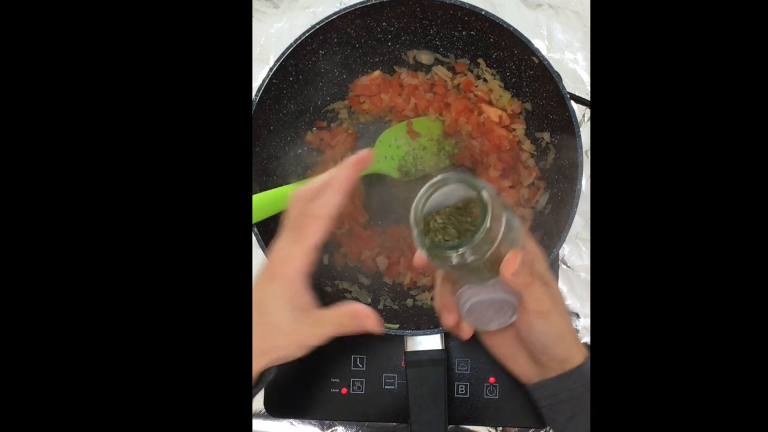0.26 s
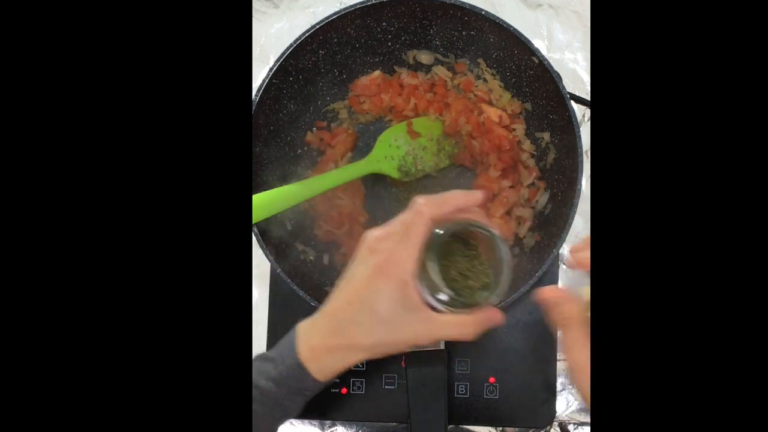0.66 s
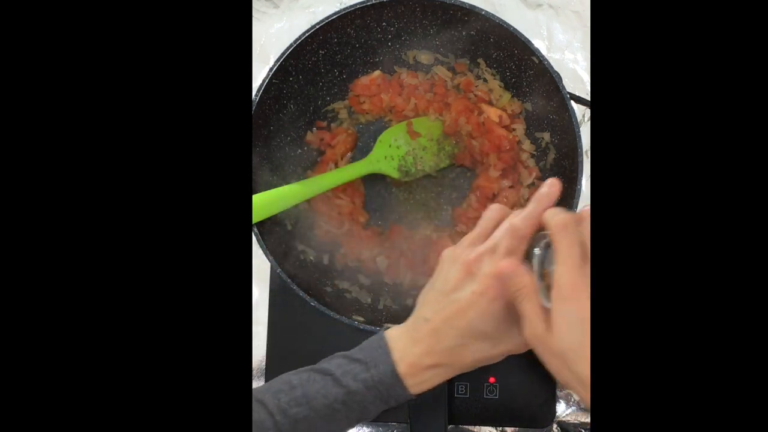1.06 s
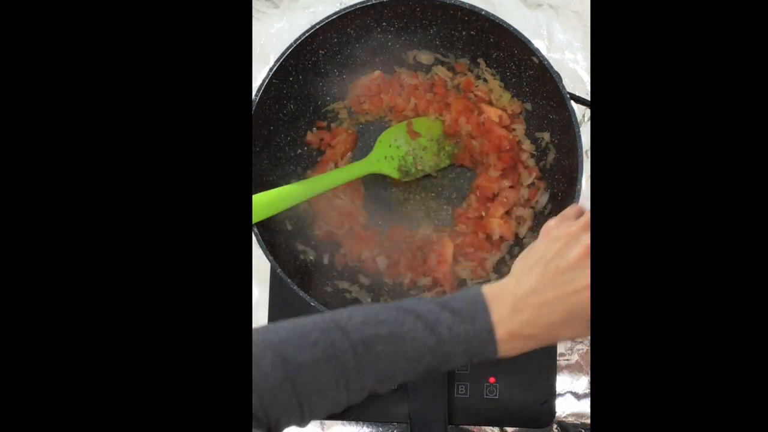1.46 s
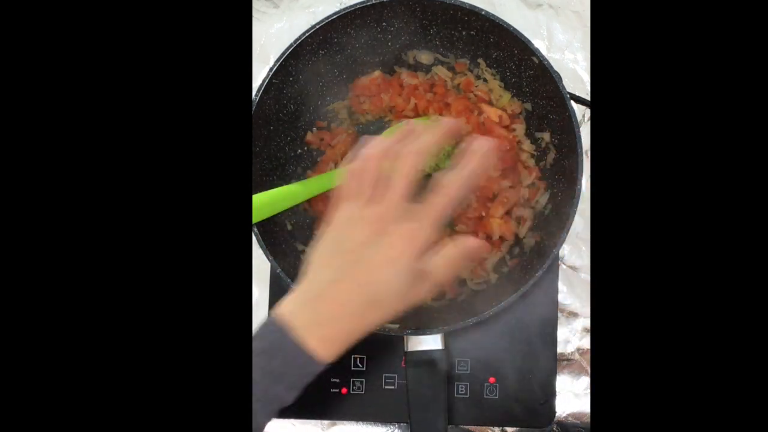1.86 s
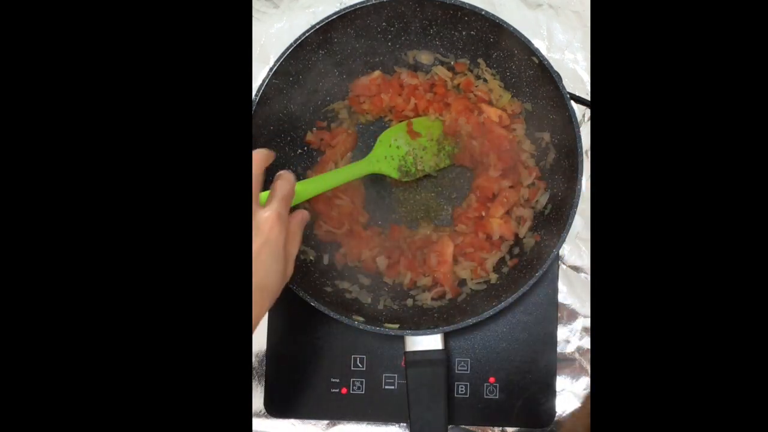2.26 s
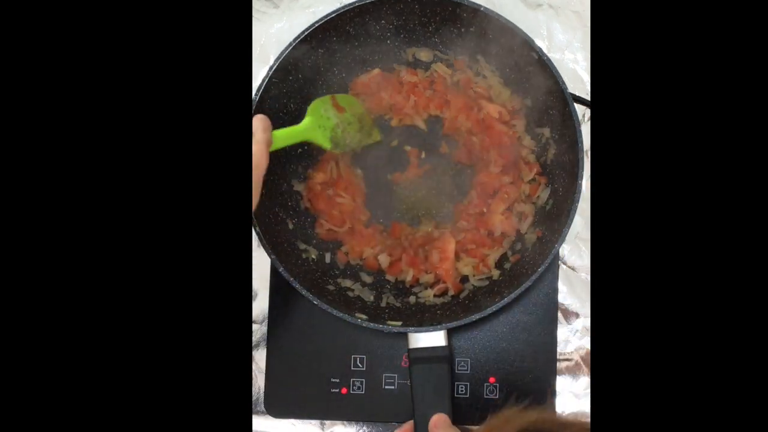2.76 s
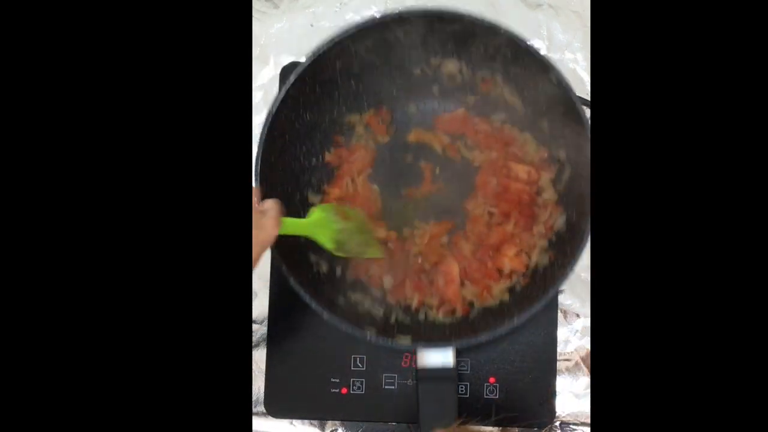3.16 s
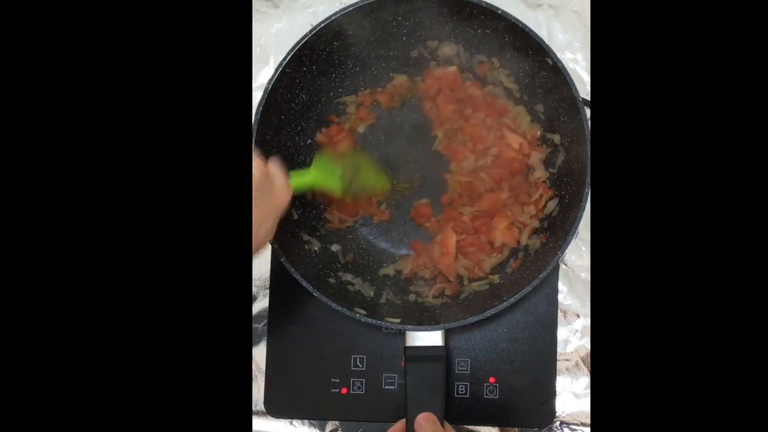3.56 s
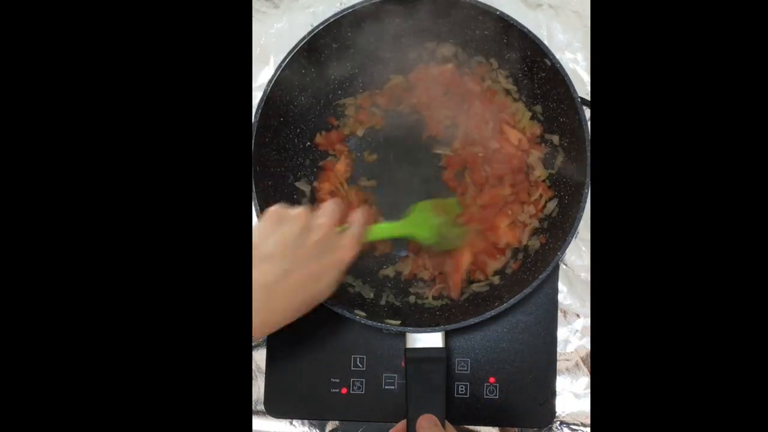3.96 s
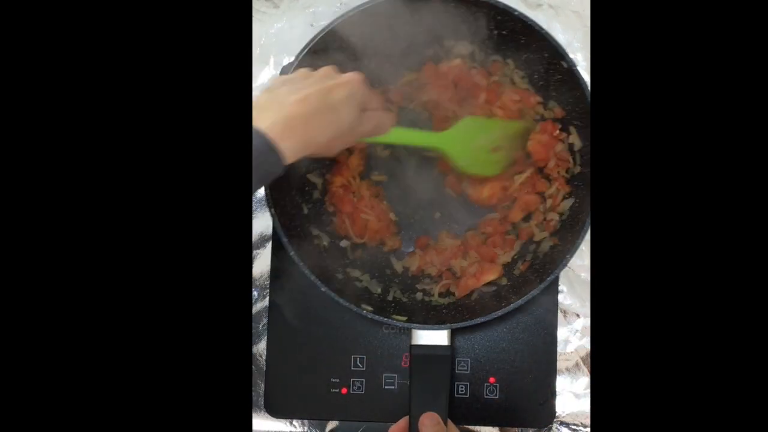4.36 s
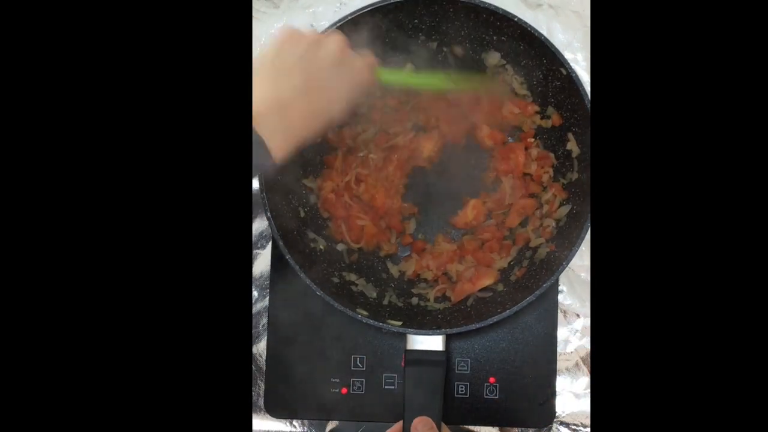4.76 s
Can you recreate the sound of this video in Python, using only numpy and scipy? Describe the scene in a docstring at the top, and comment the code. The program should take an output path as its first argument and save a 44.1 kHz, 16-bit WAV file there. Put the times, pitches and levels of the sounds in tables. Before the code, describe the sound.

Over gentle frying and a low fan drone, jar clicks, a bright glassy clatter, a ringing knock, a thud, then sizzling stirring.

```python
"""Small kitchen, induction hob: tomato and onion fry gently in a pan, as banded bursts of noise over a fan and hum.
A glass jar is capped, clatters into place, then knocks the pan with a ring and a thud:
impulses excite two-pole modes, with decaying noise for the diffuse ring.
A silicone spatula then bumps the pan in low tones and stirs; enveloped noise gives drags, squelches and surges."""
import sys
import numpy as np
from scipy import signal
from scipy.fft import rfft, irfft
from scipy.io import wavfile
from scipy.ndimage import map_coordinates

SR = 44100
rng = np.random.default_rng(int(sys.argv[2]) if len(sys.argv) > 2 else 0)


def dump_mix(stems):
    """Bounce the given channels to the path in sys.argv[1] as a 16-bit WAV at rate SR."""
    frames = np.atleast_2d(stems).T  # one column per channel
    limited = np.clip(frames, -1, 1)  # hard clip at full scale
    pcm = np.round(limited * 32767).astype(np.int16)
    wavfile.write(sys.argv[1], SR, pcm)


N = 221273
TIME_S = np.arange(N) / SR
BAND_EDGES_HZ = np.geomspace(22, 16500, 30)
BAND_CENTRES_HZ = np.sqrt(BAND_EDGES_HZ[1:] * BAND_EDGES_HZ[:-1])
TOP_CUT_HZ = 15850

# hob hum before its fade: (frequency [Hz], level [dB rms])
HOB_HUM = [(70, -81.5), (140, -74), (204.6, -75), (274.5, -76.5)]
# fan spectrum: (frequency [Hz], relative density [dB per Hz])
FAN_SPECTRUM = [(25, -20), (45, -14.5), (70, -5), (130, -12), (250, -11.5), (370, 0.5), (520, -3.5),
                (800, -4.5), (1200, -10), (2500, -51)]

# frying spectrum: (frequency [Hz], relative density [dB per Hz])
FRY_SPECTRUM = [(700, -14), (1100, -1.5), (1700, 0.5), (2600, 0.5), (3800, 5), (6000, -0.5), (9500, -0.5),
                (12500, -3), (15500, -8.5)]
# hollow of the pan over the food: (frequency [Hz], width [Hz], boost [dB])
PAN_RESONANCES = [(1650, 140, 6.5), (2294, 190, 7), (3800, 170, -1), (4460, 250, 5), (6130, 1200, 2.5),
                  (9750, 350, 4)]
# bubble sizes at rest, simmer, sizzle, spray, mist: (pitch [Hz], level [dB])
BUBBLE_SIZES = [(1500, -60), (3800, -59.5), (7500, -57.5), (12800, -61.5)]
# food settling or pushed onto hot metal: (full-strength time [s], hold [s], level [dB], brightest pitch [Hz])
FOOD_SURGES = [(1.675, 0.071, -54, 10200), (1.823, .07, -55, 4500), (2.54, 0.34, -55.5, 8500),
               (3.101, .26, -43.5, 9400), (3.454, 0.083, -38, 13000), (3.644, 0.099, -36.5, 10600),
               (3.691, 0.064, -42, 4460), (3.99, .12, -45, 6200), (4.168, 0.38, -45.3, 9940),
               (4.61, .23, -41, 6940), (4.912, .1, -43, 6930)]
SURGE_ATTACK_S, SURGE_RELEASE_DB_PER_S = 0.17, 235
# surge loss away from its brightest pitch
FALL_BELOW_DB_PER_OCTAVE2, FALL_ABOVE_DB_PER_OCTAVE2 = 2, 17.5
# juice flashing to steam on bare metal, strongest in the fine bubbles
FLASH_S, FLASH_HOLD_S, FLASH_DB, FLASH_HZ = 3.96, .02, -23.8, 9800
FLASH_ATTACK_S, FLASH_RELEASE_DB_PER_S, FLASH_FALL_DB_PER_OCTAVE2 = 0.067, 145, 13
# spatula pushes churning the coarsest bubbles: (full-strength time [s], hold [s], level [dB])
BUBBLE_PUSHES = [(3.17, 0.0044, -53), (3.425, 0.035, -48), (3.975, 0.077, -48.5), (4.145, 0.17, -50.5),
                 (4.35, .07, -51), (4.53, .47, -50.5)]
PUSH_ATTACK_S, PUSH_RELEASE_DB_PER_S = .05, 200
# drops spitting in the oil: (time [s], relative level [dB], pitch [Hz])
OIL_SPITS = [(0.132, -27.5, 4000), (2.631, -25, 9800), (3.164, -15, 2280), (3.501, -17, 12600),
             (3.583, -28, 9500), (3.647, -11, 11300), (4.075, -17, 5660), (4.345, -23, 12500),
             (4.867, -24.5, 6270), (4.909, -18.5, 6300)]

# wet food pushed across the pan: (full-strength time [s], hold [s], level [dB])
FOOD_SQUELCHES = [(3.70, 0.062, -65), (4.12, 0.023, -62), (4.29, 0.013, -54), (4.43, .09, -58),
                  (4.63, 0.22, -64), (4.97, .02, -56)]
SQUELCH_ATTACK_S, SQUELCH_RELEASE_DB_PER_S = .025, 151
# squelch spectrum: (frequency [Hz], relative density [dB per Hz])
SQUELCH_SPECTRUM = [(100, -27), (250, -16.5), (370, 2.5), (520, -4), (800, -7.5), (1200, -17), (2500, -34)]

# spatula bumping the pan: (time [s], level [dB], pitch [Hz])
SPATULA_BUMPS = [(2.8167, -11, 379.6), (2.8763, -15.5, 372), (2.901, -19, 398), (2.924, -20.5, 320),
                 (2.9696, -12.5, 369), (2.996, -22, 379), (3.027, -23.5, 385), (3.051, -22.5, 402),
                 (3.175, -37, 383), (3.2462, -24.5, 409), (3.268, -28, 429), (3.307, -35, 402),
                 (3.358, -42.5, 382), (3.491, -44.5, 372)]
# spatula dragging on the pan floor: (full-strength time [s], hold [s], level [dB])
SPATULA_DRAGS = [(2.815, 0.021, -40), (2.92, .12, -42), (3.17, 0.091, -45.5), (3.47, 0.035, -58)]
DRAG_ATTACK_S, DRAG_RELEASE_DB_PER_S = 0.018, 170
# drag spectrum: (frequency [Hz], relative density [dB per Hz])
DRAG_SPECTRUM = [(25, -20), (80, -5.5), (170, -1), (260, -4.5), (600, -9), (1200, -29.5), (3000, -47)]

# fingers and lid on the jar: (time [s], relative level [dB])
LID_CONTACTS = [(0.132, -30), (0.192, -27), (0.434, -24), (0.505, -29), (0.8815, -1.5), (0.8905, -21)]
# lid and jar mouth: (frequency [Hz], relative level [dB], t60 [s])
LID_RESONANCES = [(396.7, -24, .16), (499, -31, 0.12), (2350, -33, 0.033), (2770, -32, 0.044),
                  (3135, -31, 0.059), (3090, -33, 0.082), (3370, -26, 0.059)]
# lid diffuse ring: (frequency [Hz], relative level [dB per band], t60 [s])
LID_DIFFUSE = [(100, -78, 0.24), (397, -41, 0.2), (910, -42.5, 0.11), (1600, -43, 0.19),
               (2400, -29.5, 0.074), (3100, -25, 0.14), (3800, -57, .12), (6000, -75, .1), (12000, -67, .1)]
# jar clattering into place: (time [s], relative level [dB])
JAR_CONTACTS = [(1.380, -10), (1.3865, -1), (1.394, -5.5), (1.409, -10), (1.421, -5), (1.457, -19),
                (1.475, -17), (1.518, -49)]
# clatter resonances: (frequency [Hz], relative level [dB], t60 [s])
JAR_RESONANCES = [(861, -23.5, 0.14), (1290, -25, 0.235), (2234, -28.5, 0.32), (2306, -32, 0.19),
                  (3450, -26, 0.21), (3540, -24.5, 0.14), (3620, -19.5, 0.085), (4100, -24, 0.14),
                  (4282, -32, 0.12), (4700, -38, 0.092), (5860, -28, 0.11), (7165, -16.5, 0.2),
                  (7232, -20.5, 0.4), (7280, -19.5, 0.21), (8500, -36, 0.088), (9927, -36, 0.12),
                  (14250, -38, 0.11)]
# clatter diffuse ring: (frequency [Hz], relative level [dB per band], t60 [s])
JAR_DIFFUSE = [(40, -66.5, 0.13), (149, -50.5, 0.19), (436, -32, 0.14), (900, -29, 0.29),
               (1590, -28.5, 0.3), (2400, -21.5, 0.29), (3820, -14, 0.22), (5200, -20, 0.13),
               (7200, -14, 0.22), (9450, -18, 0.13), (12500, -32, 0.1), (15000, -27, 0.1)]

# glass touching the pan, then grazing it at another spot
KNOCK_S, GRAZE_S = 2.0765, 2.1440
# two glass modes lie close together and beat
LOWER_HZ, UPPER_HZ = 1766, 1790
# glass ring: (frequency [Hz], knock level [dB], graze level [dB], t60 before the early fade [s])
GLASS_RESONANCES = [(1214, -24.5, -35.5, 0.1), (LOWER_HZ, -12.5, -44, .5), (UPPER_HZ, -9.5, -46, 1.32),
                    (2949, -16, -29, 0.7), (4683, -20.5, -39.5, 0.23), (4938, -23.5, -36.5, .22),
                    (5412, -16.5, -44.5, .19), (5982, -27, -22, 0.17), (7090.5, -21.5, -40, 0.18),
                    (8760, -24, -32.5, 0.16), (8920, -28, -27, 0.26), (11650, -30.5, -54, 0.2),
                    (11830, -26, -56.5, 0.06), (12520, -43.5, -36, .07), (15430, -44, -58.5, 0.3)]
# knock diffuse ring: (frequency [Hz], relative level [dB per band], t60 [s])
GLASS_DIFFUSE = [(100, -60, .16), (300, -40, 0.13), (700, -39.5, .2), (1250, -20, .2), (1800, -29, 0.64),
                 (2480, -38, 0.26), (3620, -43, 0.17), (5000, -28.5, 0.19), (7000, -46, 0.14),
                 (9000, -45, 0.13), (14000, -55, .12)]
# heavy landing: (time [s], relative level [dB])
THUD_CONTACTS = [(2.1685, -15.5), (2.1812, 5.5), (2.1860, -8.5), (2.2085, -29)]
# pan and hob body: (frequency [Hz], relative level [dB], t60 [s])
THUD_RESONANCES = [(205.7, -26.5, .3), (369, -20, 0.35), (464.7, -3, 0.032), (521, -10.5, 0.19),
                   (563, -15.5, 0.22), (855, -21, .24), (936, -20.5, .3), (987, -22, .26),
                   (1557, -16, 0.086), (1927, -9.5, 0.019), (2224, -24, 0.042)]
# thud diffuse ring: (frequency [Hz], relative level [dB per band], t60 [s])
THUD_DIFFUSE = [(35, -53, 0.1), (89.9, -43, 0.21), (191, -29, .3), (270, -27, 0.3), (380, -27.5, 0.41),
                (600, -21, 0.42), (948, -24.5, 0.36), (1697, -19, 0.27), (2400, -24, 0.18),
                (3600, -58, 0.1565), (8000, -69, .12)]


def from_db(db):
    """Decibels to gain."""
    return 10 ** (np.asarray(db) / 20)


def rms_one(x):
    """Scale to unit power."""
    return x / np.sqrt(np.mean(x ** 2) + 1e-20)


def at_hz(rows, hz):
    """Each column of a spectrum, interpolated over log frequency."""
    points_hz, *columns = np.transpose(rows)
    return [np.interp(np.log(hz), np.log(points_hz), column) for column in columns]


def drift(rate_per_s):
    """Random curve: unit normal draws joined by straight lines."""
    return np.interp(TIME_S * rate_per_s, np.arange(4096), rng.standard_normal(4096))


def filtered(x, order, hz, kind="low"):
    """Butterworth filter."""
    return signal.sosfilt(signal.butter(order, hz, kind, fs=SR, output="sos"), x)


def band(x, index):
    """One third-octave band, scaled to keep the power of white noise."""
    low_hz, high_hz = BAND_EDGES_HZ[index:index + 2]
    return filtered(x + 1e-18, 2, [low_hz, high_hz], "band") * np.sqrt(SR / 2 / (high_hz - low_hz))


def resonance(x, hz, width_hz):
    """Two-pole resonance with unit peak gain."""
    r = np.exp(-np.pi * width_hz / SR)
    numerator = np.array([1, 0, -1]) * (1 - r * r) / 2
    return signal.lfilter(numerator, [1, -2 * r * np.cos(2 * np.pi * hz / SR), r * r], x + 1e-18)


def ring(x, hz, t60_s, build_up_hz=330):
    """Decaying sine per impulse; a resonance build_up_hz wide softens its onset."""
    r = from_db(-60 / (t60_s * SR))
    w = 2 * np.pi * hz / SR
    swing = signal.lfilter([0, np.sin(w)], [1, -2 * r * np.cos(w), r * r], x + 1e-18)
    return resonance(swing, hz, build_up_hz)


def clicks(rows):
    """One impulse for each (time [s], level [dB])."""
    out = np.zeros(N)
    for start_s, db in rows:
        out[round(start_s * SR)] += from_db(db)
    return out


def struck(contacts, modes):
    """The same modes rung by every contact."""
    force = clicks(contacts)
    return sum(from_db(db) * ring(force, hz, t60_s) for hz, db, t60_s in modes)


def diffuse(start_s, tail, rise_s):
    """Crowded modes and kitchen reflections: noise that builds up, then dies band by band."""
    age_s = np.arange(SR) / SR
    white = rng.standard_normal((2, SR))
    swell = np.minimum(age_s / rise_s, 1) ** 2
    sound = np.zeros(SR)
    for k, hz in enumerate(BAND_CENTRES_HZ):
        db, t60_s = at_hz(tail, hz)
        decay = from_db(db - 60 * np.maximum(age_s - rise_s, 0) / t60_s)
        # alternate noises keep neighbouring bands independent
        sound += band(white[k % 2] * swell * decay, k)
    at = round(start_s * SR)
    return np.pad(sound, (at, N - at - SR))


def reflections(x, t60_s, first_s=0.0019):
    """Dense echoes from counter and walls: convolution with unit-energy decaying noise."""
    age_s = TIME_S[:SR // 2]
    walls = rng.standard_normal(len(age_s)) * from_db(-60 * age_s / t60_s) * (age_s > first_s)
    return signal.fftconvolve(x, walls / np.linalg.norm(walls))[:N]


def coloured(spectrum):
    """Steady noise of the given spectrum, rms 1."""
    hz = np.maximum(np.arange(N // 2 + 1) * SR / N, 1)
    return rms_one(irfft(rfft(rng.standard_normal(N)) * from_db(at_hz(spectrum, hz)[0]), N))


def patchy(x, db, width_hz, per_s, size=512):
    """Each narrow strip of the spectrum swells and fades on its own."""
    overlap = size * 3 // 4
    hz, s, cells = signal.stft(x, SR, nperseg=size, noverlap=overlap)
    chance = rng.standard_normal((400, 600))
    grid = np.meshgrid(hz / width_hz, s * per_s, indexing="ij")
    field = map_coordinates(chance, grid, order=1, mode="wrap")
    gain = rms_one(from_db(db * rms_one(field)))
    return signal.istft(cells * gain, SR, nperseg=size, noverlap=overlap)[1][:N]


def envelope(full_s, hold_s, attack_s, release_db_per_s):
    """Gain that reaches 1 at full_s, holds, then dies away."""
    rise = np.clip(1 + (TIME_S - full_s) / attack_s, 0, 1) ** 2
    return rise * from_db(-release_db_per_s * np.maximum(TIME_S - full_s - hold_s, 0))


def strokes(rows, attack_s, release_db_per_s):
    """Power-summed gain of strokes (full-strength time [s], hold [s], level [dB])."""
    power = 0
    for full_s, hold_s, db in rows:
        power = power + (from_db(db) * envelope(full_s, hold_s, attack_s, release_db_per_s)) ** 2
    return np.sqrt(power)


def hob(fan_db=-65, drone_db=-65, drone_hz=366, drone_width_hz=35):
    """Fan rush as coloured noise, drone as narrow resonant noise, hum as sines that fade."""
    fade = from_db(np.interp(TIME_S, [2.1, 3.0], [1, -8]))
    hum = 0
    for hz, rms_db in HOB_HUM:
        hum = hum + np.sqrt(2) * from_db(rms_db) * np.sin(2 * np.pi * (hz * TIME_S + rng.random()))
    drone = rms_one(resonance(rng.standard_normal(N), drone_hz, drone_width_hz))
    return fade * hum + from_db(drone_db) * drone + from_db(fan_db) * coloured(FAN_SPECTRUM)


def bursts(per_s=6000, size_db=3.5, steam_share=0.49):
    """Tiny bubbles bursting at random over a hiss of steam, rms about 1."""
    sizes = from_db(size_db * np.minimum(rng.exponential(1, N), 6)) * rng.choice([-1, 1], N)
    pops = rms_one(sizes * (rng.random(N) < per_s / SR))
    return np.sqrt(1 - steam_share) * pops + np.sqrt(steam_share) * rng.standard_normal(N)


def activity(pitch_hz, rest_db):
    """Strength of one bubble size: power sum of resting fry, surges and steam flash."""
    surges = []
    for full_s, hold_s, db, brightest_hz in FOOD_SURGES:
        octaves = np.log2(pitch_hz / brightest_hz)
        fall = FALL_ABOVE_DB_PER_OCTAVE2 if octaves > 0 else FALL_BELOW_DB_PER_OCTAVE2
        surges.append((full_s, hold_s, db - fall * octaves ** 2))
    surge = strokes(surges, SURGE_ATTACK_S, SURGE_RELEASE_DB_PER_S)
    flash_db = FLASH_DB - FLASH_FALL_DB_PER_OCTAVE2 * np.log2(pitch_hz / FLASH_HZ) ** 2
    flash = from_db(flash_db) * envelope(FLASH_S, FLASH_HOLD_S, FLASH_ATTACK_S, FLASH_RELEASE_DB_PER_S)
    return np.sqrt(from_db(rest_db) ** 2 + surge ** 2 + flash ** 2)


def frying(sputter_db=1.2):
    """Four bubble sizes as bands of bursts, each sputtering alone, coloured by the pan hollow."""
    limits_hz = [850, 2700, 5300, 10500, 15500]
    shape = from_db(at_hz(FRY_SPECTRUM, BAND_CENTRES_HZ)[0]) * np.sqrt(np.diff(BAND_EDGES_HZ))
    gains = [activity(pitch_hz, rest_db) for pitch_hz, rest_db in BUBBLE_SIZES]
    gains[0] = np.hypot(gains[0], strokes(BUBBLE_PUSHES, PUSH_ATTACK_S, PUSH_RELEASE_DB_PER_S))
    sources = [bursts(), bursts()]
    fry = 0
    for gain, low_hz, high_hz in zip(gains, limits_hz, limits_hz[1:]):
        members = np.flatnonzero((BAND_CENTRES_HZ > low_hz) & (BAND_CENTRES_HZ < high_hz))
        layer = sum(shape[k] * band(sources[k % 2], k) for k in members)
        for hz, width_hz, boost_db in PAN_RESONANCES:
            layer = layer + (from_db(boost_db) - 1) * resonance(layer, hz, width_hz)
        layer = rms_one(filtered(layer, 6, low_hz, "high"))
        fry = fry + gain * from_db(sputter_db * drift(45)) * layer
    # fine random patchiness over pitch and time
    fine = patchy(fry, db=3.3, width_hz=240, per_s=24)
    # broader, slower random patchiness
    return patchy(fine, db=1.13, width_hz=700, per_s=11)


def spits(t60_s=0.13, width_share=0.13, level_db=-5):
    """Water drops burst in the oil: decaying noise through two resonances at each pitch."""
    steam = rng.standard_normal(N)
    out = 0
    for start_s, db, hz in OIL_SPITS:
        decay = from_db(db - 60 * np.clip((TIME_S - start_s) / t60_s, 0, 3))
        puff = resonance(steam * decay * (TIME_S >= start_s), hz, hz * width_share)
        out = out + resonance(puff, hz, 2 * hz * width_share)
    return from_db(level_db) * out


def squelch(lumps_db=3):
    """Soft tomato slides ahead of the spatula: coloured noise in small uneven lumps."""
    lumps = rms_one(coloured(SQUELCH_SPECTRUM) * from_db(lumps_db * drift(22)))
    return strokes(FOOD_SQUELCHES, SQUELCH_ATTACK_S, SQUELCH_RELEASE_DB_PER_S) * lumps


def spatula(t60_s=0.067, contact_width_hz=320, overtone_db=-24, room_db=-13, room_t60_s=0.41):
    """Soft silicone wakes low pan tones with a faint overtone; drags rumble as coloured noise."""
    bumps = 0
    for start_s, db, hz in SPATULA_BUMPS:
        push = clicks([(start_s, db)])
        tone = resonance(ring(push, hz, t60_s), hz, contact_width_hz)
        bumps = bumps + tone + from_db(overtone_db) * ring(push, hz * 1.7, t60_s)
    drag = strokes(SPATULA_DRAGS, DRAG_ATTACK_S, DRAG_RELEASE_DB_PER_S) * coloured(DRAG_SPECTRUM)
    return bumps + from_db(room_db) * reflections(bumps, room_t60_s) + drag


def jar(room_db=-7, room_t60_s=0.057, lid_db=1.0, lid_top_hz=3600):
    """Plastic lid snaps on with a dull low-passed click; the jar's modes rattle over a noise scuff."""
    lid = struck(LID_CONTACTS, LID_RESONANCES) + diffuse(0.8805, LID_DIFFUSE, rise_s=0.00081)
    lid = from_db(lid_db) * filtered(lid, 5, lid_top_hz)
    rattle = struck(JAR_CONTACTS, JAR_RESONANCES)
    scuff = patchy(diffuse(1.369, JAR_DIFFUSE, rise_s=0.019), db=2.5, width_hz=225.0, per_s=20)
    settling = from_db(np.interp(TIME_S, [1.49, 1.58], [0, -14]))
    clatter = rattle + from_db(room_db) * reflections(rattle, room_t60_s) + scuff
    return lid + clatter * settling


def thud(top_hz=3000):
    """The weight lands: body modes and diffuse noise, low-passed, fading further at the end."""
    body = struck(THUD_CONTACTS, THUD_RESONANCES)
    rumble = patchy(diffuse(2.177, THUD_DIFFUSE, rise_s=0.0032), db=1.0, width_hz=130, per_s=25)
    return filtered(body + rumble, 4, top_hz) * from_db(np.interp(TIME_S, [2.34, 2.43], [0, -6]))


def knock(fade_from_s=2.158, hold_s=0.185, fade_db=22, fade_s=.16, room_db=-12, room_t60_s=0.14,
          build_up_share=0.023, graze_build_up_hz=55, graze_tail_db=-14, waver_db=3.0, waver_per_s=90):
    """A hard touch rings the glass modes, a graze swells the high ones; the ring fades out early."""
    chime = 0
    for hz, knock_db, graze_db, t60_s in GLASS_RESONANCES:
        mode = ring(clicks([(KNOCK_S, knock_db)]), hz, t60_s, build_up_share * hz)
        mode = mode + ring(clicks([(GRAZE_S, graze_db)]), hz, t60_s, graze_build_up_hz)
        # around the landing the ring is cut short, high modes first
        ratio = hz / UPPER_HZ
        faded = np.maximum(TIME_S - fade_from_s - hold_s / ratio ** 2, 0) * ratio ** .9 / fade_s
        # higher modes waver more, within limits
        waver = waver_db * np.clip(np.log2(ratio), .15, 1.5) * drift(waver_per_s)
        chime = chime + from_db(waver - fade_db * np.minimum(faded, 3) ** 2) * mode
    crack = diffuse(KNOCK_S, GLASS_DIFFUSE, rise_s=.003)
    graze = from_db(graze_tail_db) * diffuse(GRAZE_S, GLASS_DIFFUSE, rise_s=.006)
    return chime + from_db(room_db) * reflections(chime, room_t60_s) + crack + graze


def scene():
    """Sum of all sources, one channel."""
    background = hob() + frying() + spits()
    stirring = squelch() + spatula()
    return (background + stirring + jar() + knock() + thud())[None]


def record(dry, low_cut_hz=42):
    """The microphone sheds deep bass and limits the loudest blows with a hard knee; the top is cut."""
    lean = filtered(dry, 2, low_cut_hz, "high")
    limited = .97 * lean / (1 + lean ** 16) ** (1 / 16)
    return signal.sosfilt(signal.ellip(12, .1, 80, TOP_CUT_HZ, fs=SR, output="sos"), limited)


dry = scene()
out = record(dry)
dump_mix(out)
```